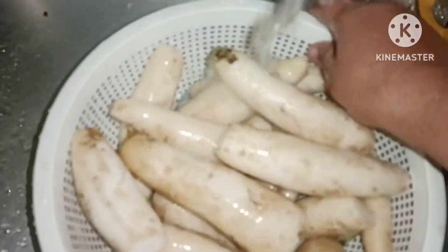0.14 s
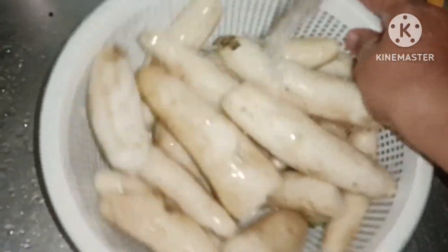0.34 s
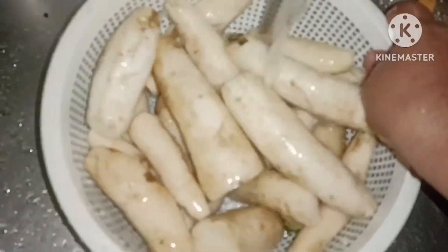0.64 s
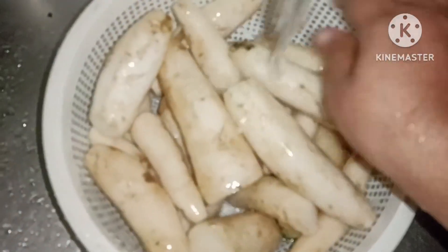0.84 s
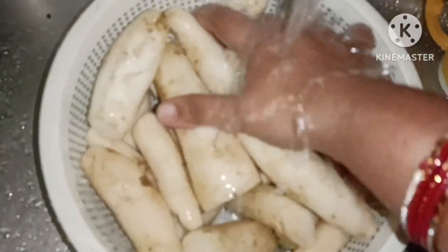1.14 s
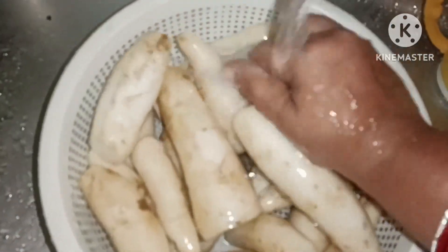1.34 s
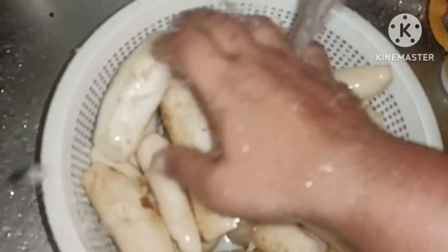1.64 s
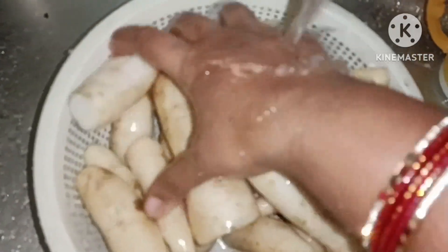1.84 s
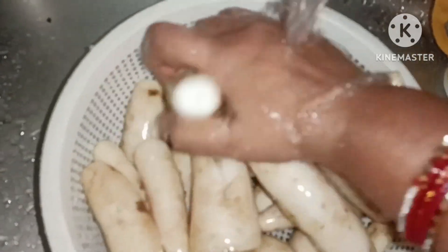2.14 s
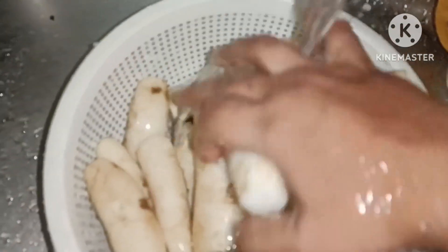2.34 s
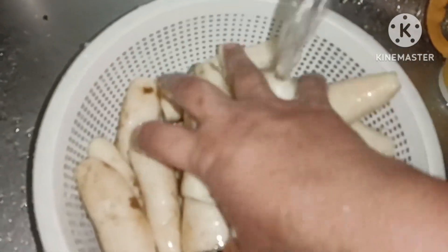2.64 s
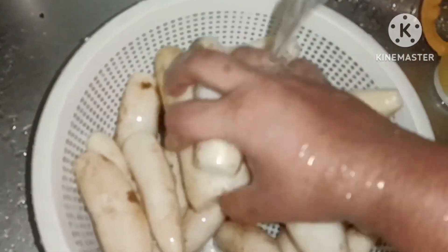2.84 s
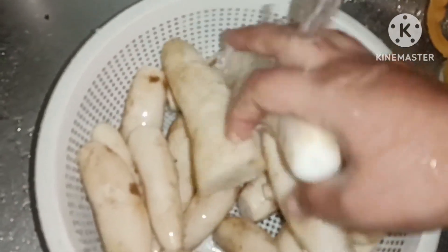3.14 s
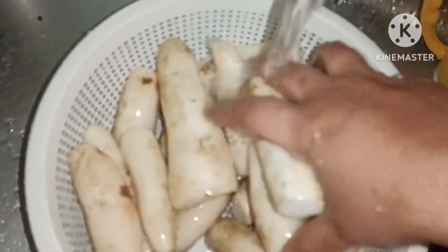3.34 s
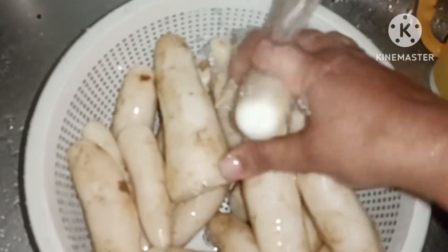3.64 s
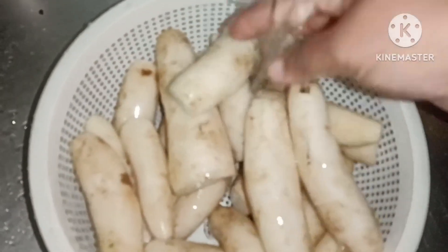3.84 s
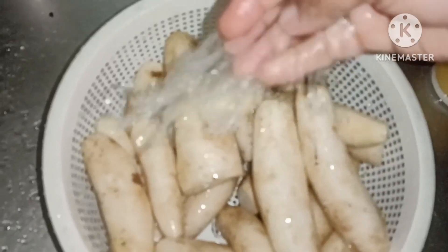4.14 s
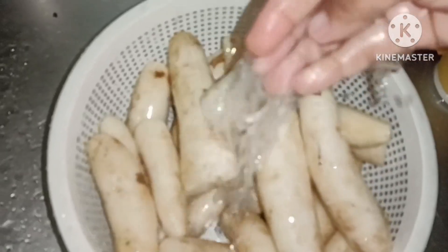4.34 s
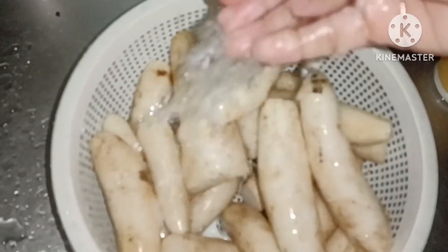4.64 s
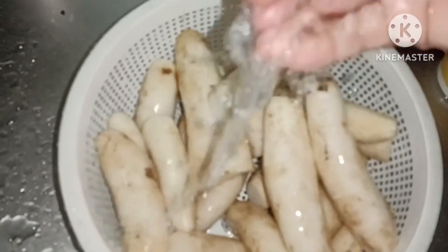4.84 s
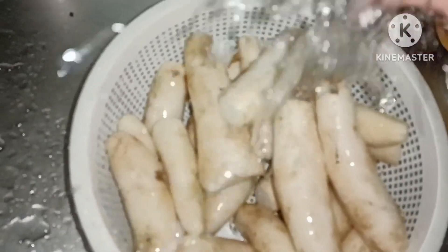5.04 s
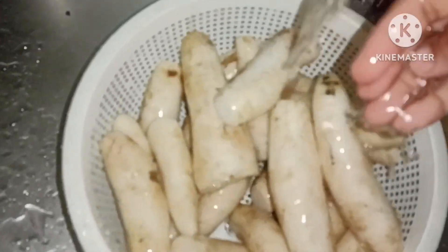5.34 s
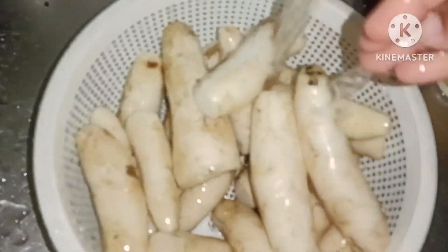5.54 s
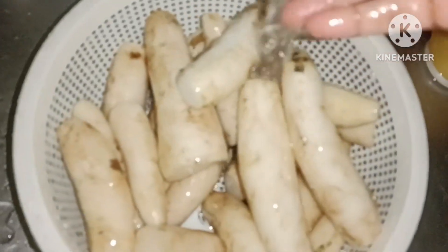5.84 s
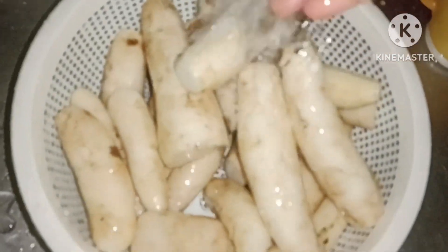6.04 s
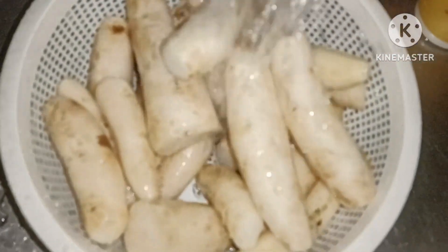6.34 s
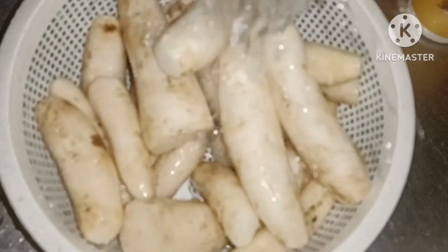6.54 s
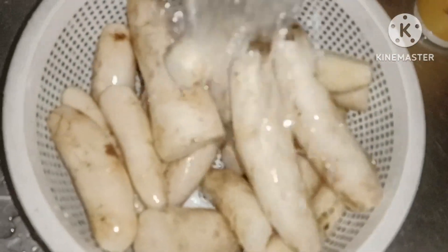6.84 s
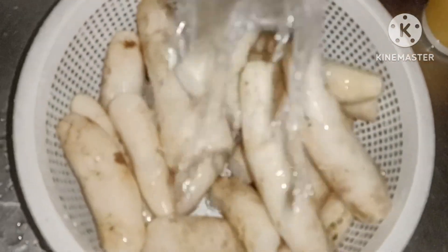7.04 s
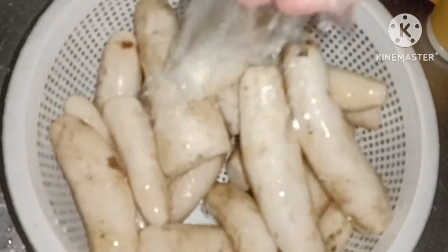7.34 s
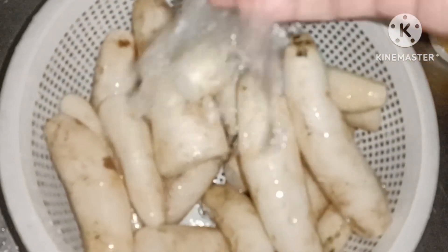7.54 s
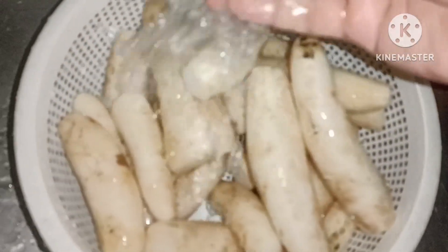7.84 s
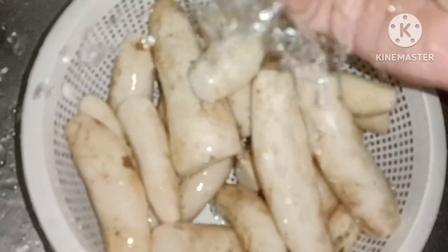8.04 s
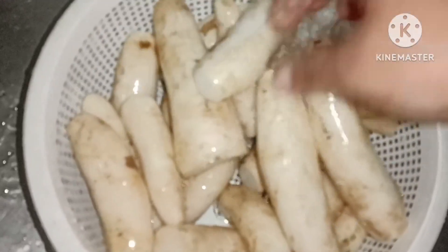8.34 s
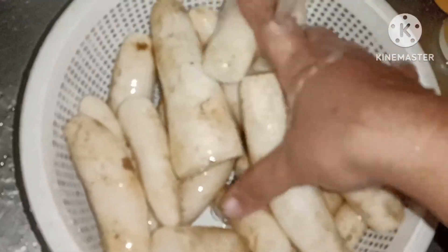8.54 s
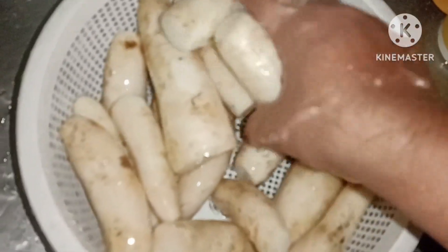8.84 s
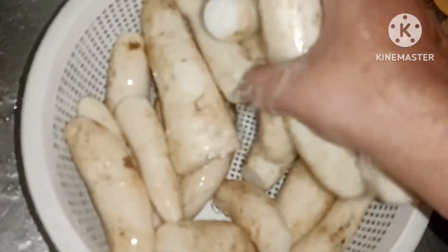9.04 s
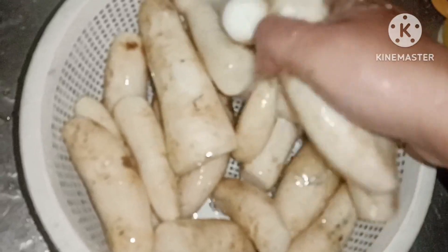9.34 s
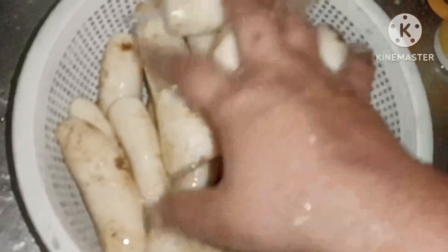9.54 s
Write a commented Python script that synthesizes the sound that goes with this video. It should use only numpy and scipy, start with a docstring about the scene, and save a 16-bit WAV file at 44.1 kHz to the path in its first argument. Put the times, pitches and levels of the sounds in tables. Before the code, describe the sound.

A tap runs and splashes over vegetables in a colander while a hand shuffles them, knocking and rumbling against a steel sink.

```python
"""Rinsing vegetables in a steel sink

A kitchen tap runs over vegetables in a plastic colander, close to a two-port microphone.
The water hisses, spits drops and slaps; trapped air pings, and trickles ring the sink.
Underneath, the stream drums and gurgles on the basin, which rumbles when a hand shoves
the vegetables and booms when it drops them."""
import sys
import numpy as np
from scipy import signal
from scipy.fft import rfft, irfft, next_fast_len
from scipy.io import wavfile
from scipy.ndimage import uniform_filter1d

SR = 44100
rng = np.random.default_rng(int(sys.argv[2]) if len(sys.argv) > 2 else 0)


def wav_out(sig):
    """Save sig, one row per channel (or a flat mono array), as 16-bit PCM at SR to the path in sys.argv[1]."""
    wavfile.write(sys.argv[1], SR, np.round(np.clip(np.atleast_2d(sig).T, -1, 1) * 32767).astype(np.int16))


N = 426888
T = np.arange(N) / SR
HZ = np.fft.rfftfreq(next_fast_len(N + SR // 2), 1 / SR)


# The stream's slow changes: time_s, level_db, brightness_db_per_octave
STREAM = [(0, -36, 1.5), (.3, -32.5, -1), (.75, -34.5, -2), (1.2, -35, -1), (1.6, -36, -0.5),
          (2.2, -36.5, 0.5), (2.6, -32, -2.5), (3.1, -33.5, -1.5), (3.7, -34, -1.5), (4.2, -37, -0.5),
          (4.5, -34, -1), (5.2, -34.5, 0), (5.7, -35.5, 0), (6.3, -33.5, -0.5), (6.6, -33, 2),
          (6.87, -37, -1), (7.6, -33.5, -1), (8.2, -35, -1), (8.7, -33, -0.5), (9.2, -35, -1.5),
          (9.68, -35, 0)]
def splash(drop_share=0.49, patch_db=1.5, flicker_db=0.7, correlation=0.063, tilt_per_db=-0.2737):
    """The stream breaks into hiss and drops, in drifting patches; more water sounds fuller."""
    a, b = rng.standard_normal((2, N))
    hiss = np.array([a, correlation * a + np.sqrt(1 - correlation ** 2) * b])
    hiss = hiss * lumps(0.01, flicker_db) * (1 + .6 * spits())
    water = np.sqrt(1 - drop_share) * unit_rms(hiss) + np.sqrt(drop_share) * drops()
    hz, t, spectrum = signal.stft(water, SR, nperseg=256, noverlap=192)
    patches = rng.standard_normal((len(t), len(hz)))
    patches = uniform_filter1d(uniform_filter1d(patches, 25, 0), 7, 1)
    patches = unit_rms(patches - uniform_filter1d(patches, 150, 0)).T
    times, level_db, brightness = np.transpose(STREAM)
    octaves = np.log2(np.maximum(hz, 600) / 3000)[:, None]
    octaves += 2.6 * np.minimum(octaves + 1.07, 0)  # a thin stream loses its low end first
    surge = surge_db(t)
    tilt = np.interp(t, times, brightness) + tilt_per_db * surge
    spectrum *= gain_of(np.interp(t, times, level_db) + surge + octaves * tilt + patch_db * patches)
    return signal.istft(spectrum, SR, nperseg=256, noverlap=192)[1][:, :N]


def spits(per_s=40, spread_db=3.5, t60_s=0.02):
    """The stream breaks up: an envelope of sudden, fast-dying bursts."""
    return signal.lfilter([1], [1, -gain_of(-60 / (t60_s * SR))], impulses(per_s, spread_db))


def drops(per_s=1500, spread_db=4.5):
    """Single drops make short rising pings, bunched in spurts; a few are large."""
    sizes = gain_of(spread_db * np.minimum(rng.exponential(1, N), 4))
    hits = sizes * (rng.random(N) < per_s * lumps(.015, 4) / SR)
    pitch_index, out = rng.integers(0, 30, N), np.zeros(N)
    for k, hz in enumerate(np.geomspace(1300, 15000, 30)):
        cycles = np.arange(int(20 * SR / hz)) * hz / SR
        ping = np.sin(2 * np.pi * cycles * (1 + 0.0085 * cycles)) * np.exp(-cycles / 2.5)
        ping *= hz ** 0.96  # small drops are short, so they are weighted up
        out += signal.oaconvolve(hits * (pitch_index == k), ping)[:N]
    return unit_rms(wall_reflections(out))


# Gathered water spills at once: start_s, hold_s, lift_db
GUSHES = [(0, .01, 6), (.12, 0.057, 3), (.46, 0.027, 6), (1.26, .02, 1), (1.37, 0.31, 5.5), (1.82, 0.13, 7),
          (1.99, 0.032, 3), (2.18, 0.0059, 0), (2.4, .02, -2.5), (2.51, 0.049, 3.5), (2.86, 0.068, 1),
          (3.12, 0.026, 2.5), (3.3, .11, 3.5), (3.53, 0.075, 2.5), (3.98, 0.15, 5.5), (4.93, 0.025, 4),
          (5.44, 0.085, 5), (5.59, 0.058, 5), (5.7, 0.019, 8), (5.78, 0.032, 7.5), (5.865, 0.05, 5),
          (6.52, 0.016, 2.5), (6.93, 0.086, 6), (7.24, 0.024, 1.5), (7.43, .02, 3), (7.79, .02, 1),
          (8.45, 0.072, 7), (8.98, 0.024, 3.5), (9.41, 0.047, 6), (9.59, .02, -1.5)]
# The splash thins for a moment, then snaps back: start_s, hold_s, dip_db
LULLS = [(1.07, 0.014, 3.5), (1.16, .08, 2.5), (1.67, 0.029, 9.5), (1.96, 0.0087, 7.5), (2.08, 0.064, 3),
         (2.33, 0.038, 5.5), (2.46, 0.023, 6.5), (3.47, 0.012, 4), (3.64, 0.036, 2), (3.79, 0.023, 2.5),
         (4.25, 0.1, 4.5), (5.33, .03, 4.5), (5.84, 0.012, 4.5), (7.52, 0.015, 4), (8.33, 0.094, 5),
         (9.09, 0.089, 2.5), (9.51, .02, 1)]
def surge_db(t):
    """How far gushes lift the stream and lulls lower it."""
    def ramps(table, attack_s, release_s):
        return sum(np.interp(t, [s - attack_s, s, s + hold, s + hold + release_s], [0, db, db, 0])
                   for s, hold, db in table)
    return ramps(GUSHES, attack_s=0.043, release_s=0.04) - ramps(LULLS, attack_s=0.047, release_s=0.028)


# Slaps of water: start_s, level_db, pitch_hz, relative_spray_db
SLAPS = [(0.1196, -11, 4080, -26), (0.1488, -15, 2580, -17), (0.368, -23.5, 2720, 8.5),
         (0.5816, -14, 2160, -5), (0.7364, -17, 2730, -5), (0.8797, -22.5, 3100, 3.5),
         (0.9954, -16.5, 3980, -18), (1.098, -10, 1740, -17), (1.2562, -10, 2460, -7),
         (1.3678, -11, 2200, -24), (1.8194, -13, 2100, -23), (1.8569, -10.5, 2500, -9),
         (1.9112, -20, 2550, 2.5), (1.979, -23, 2820, 4), (2.1307, -22, 3320, -9), (2.1549, -19, 3300, -21),
         (2.169, -17.5, 2980, -12), (2.252, -11.5, 2900, -5), (2.2976, -12.5, 2900, -30),
         (2.404, -16, 3230, -8), (2.497, -12, 2400, -4.5), (2.86, -13.5, 1780, -25),
         (3.137, -11.5, 3530, -8), (3.297, -18, 2840, -9), (3.3722, -15.5, 1750, -9),
         (3.579, -18.5, 2370, -16), (3.612, -13.5, 3980, -13), (3.8598, -16.5, 1680, -25),
         (3.912, -8.5, 3000, -22), (3.9764, -11, 2020, -12), (4.028, -24, 2240, 5.5),
         (4.0536, -19, 1500, -6), (4.086, -12.5, 3380, -22), (4.117, -20.5, 1680, 1),
         (4.1973, -21.5, 2420, -16), (4.308, -20, 4230, -6), (4.3938, -14.5, 3300, -18),
         (4.449, -16.5, 4400, -9), (4.489, -12, 4140, -11), (4.7405, -15.5, 3230, -14),
         (4.9282, -13, 1960, -14), (4.937, -16, 2600, -14), (4.952, -14, 2060, -16),
         (4.968, -10, 2110, -22), (5.104, -19.5, 2460, -4), (5.139, -17, 4250, -11),
         (5.5892, -16, 1790, -15), (5.619, -14.5, 3230, -11), (5.7062, -13, 2900, -15),
         (6.065, -25, 5060, -2), (6.0998, -10.5, 1900, -28), (6.999, -15, 2420, -14),
         (7.211, -19.5, 2570, 1), (7.343, -13, 3600, -14), (7.4393, -12.5, 2620, -17),
         (7.608, -17.5, 3950, -19), (7.785, -14.5, 3770, -12), (7.9017, -19, 2180, -20),
         (7.927, -20, 2940, -18), (8.031, -18, 2070, -10), (8.083, -18, 2310, -4), (8.2254, -19, 2210, -19),
         (8.2565, -11.5, 2350, -27), (8.323, -17, 4660, -15), (8.3794, -19.5, 2080, -7),
         (8.428, -17.5, 2280, -15), (8.98, -16, 3670, -11), (9.107, -10.5, 2410, -27),
         (9.196, -22, 2900, -11), (9.234, -19, 3100, -4.5), (9.3867, -13.5, 1800, 0),
         (9.416, -16, 5430, -5), (9.5617, -18, 5130, -3), (9.5806, -10, 2560, -10), (9.603, -14, 3300, -15)]
def slaps(correlation=0.22, t60_s=0.036, crack_s=0.00091, attack_s=0.00029):
    """Each slap throws a broad crack of spray and traps a pocket of air that rings briefly."""
    out, t = np.zeros((2, N)), np.arange(SR // 8) / SR
    envelope = gain_of(-60 * t / t60_s) * (1 - np.exp(-t / attack_s))
    noises = rng.standard_normal((len(SLAPS), 2, len(t)))
    for (start, db, hz, spray_db), (a, b) in zip(SLAPS, noises):
        burst = np.array([correlation * a + np.sqrt(1 - correlation ** 2) * b, a])
        chirp = np.sin(2 * np.pi * hz * t * (1 + 2.6 * t))  # rises as the pocket nears the surface
        pocket = 0.28 * chirp + 0.41 * resonate(burst, hz, 0.17 * hz)
        spray = gain_of(spray_db) * burst * (1 + 0.49 * np.exp(-t / crack_s))
        add(out.T, start, (gain_of(db) * envelope * (pocket + spray)).T)
    return out


def bubbles(per_s=110, spread_db=3.5, decay_cycles=3.4, relative_db=-12):
    """Sparse pockets of air ring a few cycles, rising a little; their level follows the stream."""
    hits = impulses(per_s, spread_db)
    pitch_index, out = rng.integers(0, 16, N), np.zeros(N)
    for k, hz in enumerate(np.geomspace(1600, 5500, 16)):
        cycles = np.arange(int(40 * SR / hz)) * hz / SR
        envelope = np.exp(-cycles / decay_cycles) * np.minimum(cycles, 1)
        ping = np.sin(2 * np.pi * cycles * (1 + 0.0018 * cycles)) * envelope
        out += signal.oaconvolve(hits * (pitch_index == k), ping)[:N]
    times, stream_db, _ = np.transpose(STREAM)
    level = gain_of(relative_db + np.interp(T, times, stream_db) + surge_db(T))
    return level * unit_rms(wall_reflections(out, t60_s=0.031, direct=.8))


# The hand pushes the pile against the basin: start_s, hold_s, level_db
SHOVES = [(0, 0.055, -36.5), (0.292, 0.02, -42), (0.465, 0.071, -32), (0.597, 0.16, -45.5),
          (.91, 0.06, -44.5), (1.133, 0.036, -33.5), (1.274, 0.06, -39), (1.333, .04, -36),
          (1.582, 0.045, -37.5), (1.692, 0.044, -52), (1.772, 0.071, -40), (1.87, 0.064, -36),
          (1.992, 0.18, -38), (2.2, 0.099, -47), (2.308, 0.16, -39), (2.524, .01, -34), (2.625, 0.036, -46),
          (2.705, 0.074, -42.5), (2.83, 0.013, -30), (2.878, 0.022, -26), (3.013, 0.075, -39),
          (3.179, 0.036, -35), (3.243, 0.022, -31.5), (3.327, 0.013, -25), (3.465, 0.071, -32.5),
          (3.568, 0.039, -30), (3.706, 0.049, -50), (3.812, 0.0087, -37), (3.882, 0.021, -25),
          (4.253, 0.017, -54), (4.446, 0.033, -55), (4.774, .025, -52), (5.378, 0.027, -56),
          (5.617, 0.042, -56), (5.94, 0.087, -46), (6.06, .04, -55), (6.45, .03, -55), (6.907, 0.21, -46),
          (7.265, 0.069, -47), (7.37, 0.044, -46.5), (8.55, .12, -32), (8.74, 0.046, -39),
          (8.82, 0.027, -30.5), (8.877, 0.11, -37.5), (9.127, 0.06, -41), (9.241, 0.1, -40.5),
          (9.398, 0.13, -33.5), (9.584, .02, -35.5)]
def shoves(resting_db=-63):
    """Shoved vegetables make the basin rumble; a faint rumble stays between pushes."""
    rubbing = rng.standard_normal((3, N))  # one shared noise, then one for each side
    pushes = swells(*np.transpose(SHOVES), rise_db_per_s=796, fall_db_per_s=270)
    effort = np.hypot(pushes, gain_of(resting_db) * lumps(0.067, 3.8, slow_s=0.68))
    return steadied(basin(rubbing[0] + 0.14 * rubbing[1:], "shoved")) * effort


# Vegetables knock the colander into the basin: start_s, strength_db, contact_ms
KNOCKS = [(0.467, -13.5, 1.1), (0.506, -16, 1.8), (0.529, -19, 1.7), (1.33, -25, 0.79), (1.869, -46, 2.8),
          (2.517, -33, 2.2), (2.892, -12, 2.2), (3.319, -13, 2), (3.426, -13.5, 4.4), (3.874, 7, 7.6),
          (8.606, -16.5, 2.2), (9.132, -58, 1.4), (9.438, -14, 3)]
def knocks():
    """Each knock booms the basin; a longer contact reaches fewer high modes."""
    force = np.zeros(N)
    for start, db, contact_ms in KNOCKS:
        push = np.hanning(round(contact_ms * SR / 1000) + 2)
        add(force, start, gain_of(db) * push / push.sum())
    return gain_of(38) * basin(force, "knocked")


# The stream landing on steel: time_s, hollow_db, gurgle_db, gurgle_hz
DRUMMING = [(0, -46, -60, 970), (.35, -70, -48, 1100), (.6, -49, -45.5, 755), (1.0, -56, -49.5, 695),
            (1.24, -57, -61, 860), (1.55, -56, -58, 720), (1.75, -63, -68, 855), (2.3, -55, -61.5, 685),
            (2.7, -51.5, -53, 780), (3.2, -50.5, -55, 800), (3.8, -53, -70, 720), (4.3, -56.5, -75, 1000),
            (4.9, -64, -77, 1050), (5.3, -55, -61.5, 800), (5.6, -58, -48.5, 660), (5.92, -47, -45, 670),
            (6.03, -73, -61, 650), (6.3, -73, -70, 900), (6.58, -57, -56.5, 800), (6.85, -69, -70, 910),
            (7.08, -52, -51.5, 710), (7.28, -72, -74, 880), (7.5, -64.5, -52, 1070), (7.9, -70, -62.5, 930),
            (8.25, -53, -69, 635), (8.5, -52.5, -58, 915), (9.0, -48.5, -54, 680), (9.25, -50.5, -85, 750),
            (9.68, -50.5, -76, 705)]
# Water sloshes, mostly when the basin is jolted: start_s, hold_s, hollow_db, gurgle_db
SLOSHES = [(0, 0.014, -45, -57), (.47, 0.041, -35.5, -40), (1.341, 0.057, -41.5, -47.5),
           (1.86, 0.05, -40.5, -48), (2.014, .03, -48, -59), (2.1, 0.026, -50, -68),
           (2.53, 0.09, -48.5, -46), (2.882, 0.074, -48, -51), (2.98, 0.025, -46, -44),
           (3.332, 0.028, -35, -46), (3.71, 0.022, -46, -76), (3.905, 0.14, -47, -44.5),
           (4.48, 0.027, -51, -74), (5.362, .04, -44.5, -61), (6.062, .015, -68, -47),
           (6.1, 0.0089, -53, -47), (6.92, 0.07, -73, -57), (8.358, 0.038, -47, -79),
           (8.61, 0.057, -44, -50), (8.752, 0.084, -45.5, -48), (9.135, 0.022, -45.5, -70),
           (9.376, 0.033, -45.5, -47)]
def drumming(surge_share=0.45, slosh_hz=660):
    """Water drums a hollow ring from the basin and gurgles, swelling with gushes and sloshes."""
    times, *curves = np.transpose(DRUMMING)
    hollow_db, gurgle_db, gurgle_hz = (np.interp(T, times, curve) for curve in curves)
    starts, holds, *levels = np.transpose(SLOSHES)
    slosh_hollow, slosh_gurgle = (swells(starts, holds, db, rise_db_per_s=504, fall_db_per_s=175)
                                  for db in levels)
    surge = gain_of(surge_share * surge_db(T))
    hollow_gain = np.hypot(surge * gain_of(hollow_db), slosh_hollow)
    gurgle_gain = np.hypot(surge * gain_of(gurgle_db), slosh_gurgle)
    gurgle_hz += (slosh_hz - gurgle_hz) * (slosh_gurgle / gurgle_gain) ** 2  # a slosh gurgles low
    patter = rng.standard_normal((3, N)) * lumps(.02, 3.0)
    hollow = unit_rms(basin(patter[0] + 1.12 * patter[1:], "drummed"))
    return hollow * hollow_gain + gurgle(gurgle_hz) * gurgle_gain


def gurgle(centre_hz, width_hz=260):
    """Lumpy noise rings a broad hollow between water and steel, whose pitch moves."""
    churn = (rng.standard_normal(N) + rng.standard_normal((2, N))) * lumps(0.037, 3.34)
    carrier = np.exp(2j * np.pi * np.cumsum(centre_hz) / SR)
    pole = np.exp(-np.pi * width_hz / SR)
    baseband = signal.lfilter([1], np.convolve([1, -pole], [1, -pole]), churn / carrier)
    return unit_rms((carrier * baseband).real)


# Trickles that keep the sink ringing: start_s, length_s, pitch_hz, level_db
TRICKLES = [(1.354, 0.051, 1760, -35), (1.47, 0.29, 2940, -42), (1.494, .09, 2100, -30.5),
            (1.836, 0.11, 3300, -42), (2.123, 0.07, 3430, -41), (2.23, .1, 2880, -31.5),
            (3.28, 0.038, 2900, -46), (3.281, 0.2, 1530, -39.5), (4.025, 0.055, 1440, -34.5),
            (4.296, 0.058, 2260, -38.5), (4.935, 0.078, 2240, -33), (5.433, 0.12, 3000, -33.5),
            (5.581, 0.063, 1830, -31), (6.558, 0.14, 1850, -40), (6.901, 0.084, 3450, -31),
            (7.625, 0.07, 2240, -51), (8.85, 0.082, 1850, -37.5)]
def trickles(width_hz=55, per_s=90):
    """Drops in quick uneven succession strike one narrow ring of the sink, off to the right."""
    out, draws = np.zeros((2, N)), rng.random((len(TRICKLES), 2, SR // 4))
    for (start, length, hz, db), (chance, size) in zip(TRICKLES, draws):
        count = min(round(length * SR), len(chance))
        hits = (chance < per_s / SR) * (0.37 + size)
        wash = 0.032 * (size - .5)
        ring = resonate((hits + wash)[:count], hz, width_hz) * signal.windows.tukey(count, .4)
        add(out.T, start, gain_of(db) * np.outer(ring, gain_of([-7, 0])))
    return out


# The basin's low modes: pitch_hz, width_hz, shoved_db, drummed_db, knocked_db
BASIN_MODES = [(65.6, 61, -9, -45, -33), (121.6, 24.3, 9.5, -9, -3), (183.5, 50.6, -5, -39, -12),
               (249.7, 9.5, -61, -21, 2), (271, 35, -49, 0.5, -8.5), (369, 75, -22.5, 4.5, -5),
               (471, 38, -26, 19, -5), (524, 110, -44, -8, -13), (654, 28, -43, -36, -10),
               (930, 88, -21, -4, -12)]
def basin(x, drive):
    """The steel rings in modes of alternating polarity, weighted by how it is driven."""
    column = 2 + ["shoved", "drummed", "knocked"].index(drive)
    modes = ((-1) ** k * gain_of(row[column]) * mode(*row[:2]) for k, row in enumerate(BASIN_MODES))
    return filtered(x, sum(modes))


# The sink's higher rings: pitch_hz, width_hz, strength
SINK_RINGS = [(1383, 130, 1), (1790, 37, 0.89), (2160, 13, 1), (2447, 46, 0.74), (2900, 47, 0.64),
              (3450, 53, 0.22), (3980, 62, 0.065)]
# The tone of the splash at each microphone port: frequency_hz, left_db, right_db
PORT_TONE = [(483, -33.5, -11), (740, -64, -48), (1055, -19, -15.5), (1200, -25.5, -19.5),
             (2060, -19.5, -10.5), (2900, -20, -13), (4400, -23.5, -15), (5490, -18, -16),
             (6850, -19, -27.5), (7590, -22, -27), (9470, -36.5, -34.5), (9550, -31.5, -28),
             (12200, -24.5, -26.5), (14900, -19, -32.5), (16500, -15, -53)]
def splash_colour(x, low_cut_hz=1050):
    """The sink's rings and each port's tone colour the spray, which has no bass."""
    hz, *sides = np.transpose(PORT_TONE)
    tone = gain_of([np.interp(np.log(HZ + 1), np.log(hz), db) for db in sides])
    low_cut = (HZ ** 2 / (HZ ** 2 + low_cut_hz ** 2)) ** 2
    rings = 1 + sum(strength * mode(pitch, width) for pitch, width, strength in SINK_RINGS)
    colour = tone * low_cut * rings
    return filtered(x, colour / np.sqrt(np.mean(abs(colour) ** 2) / 2))


def wall_reflections(x, t60_s=0.053, direct=.55, wander_hz=3.1):
    """Close stereo echoes inside the sink; three sets take turns as the water lands elsewhere."""
    t = np.arange(SR // 16) / SR
    tails = rng.standard_normal((3, 2, len(t))) * gain_of(-60 * t / t60_s)
    tails *= np.sqrt(1 - direct ** 2) / np.linalg.norm(tails, axis=2, keepdims=True)
    tails[..., 0] = direct
    fades = [np.cos(2 * np.pi * (wander_hz * T + k / 3)) for k in range(3)]
    return sum(signal.oaconvolve((x * fade)[None], tail, axes=1)[:, :N]
               for fade, tail in zip(fades, tails))


def impulses(per_s, spread_db):
    """Randomly timed hits, mostly small, a few large."""
    sizes = gain_of(spread_db * np.minimum(rng.exponential(1, N), 3))
    return sizes * (rng.random(N) < per_s / SR)


def lumps(smooth_s, spread_db, slow_s=.12):
    """A random gain that wanders over smooth_s and evens out over slow_s."""
    size = round(smooth_s * SR)
    wander = uniform_filter1d(uniform_filter1d(rng.standard_normal(N), size), size)
    return gain_of(spread_db * unit_rms(wander - uniform_filter1d(wander, round(slow_s * SR))))


def swells(starts, holds, levels_db, rise_db_per_s, fall_db_per_s):
    """Combined gain of events that climb to their level, hold it and die away."""
    power = np.zeros(N)
    for start, hold, db in zip(starts, holds, levels_db):
        before_s, after_s = np.maximum(start - T, 0), np.maximum(T - start - hold, 0)
        power += gain_of(db - rise_db_per_s * before_s - fall_db_per_s * after_s) ** 2
    return np.sqrt(power)


def steadied(x, window_s=0.03, depth=0.47):
    """Tames the chance swells of narrow noise."""
    power = uniform_filter1d((x ** 2).mean(0), round(window_s * SR))
    return unit_rms(x / (abs(power) + 0.015 * power.mean()) ** (depth / 2))


def resonate(x, hz, width_hz):
    """Rings a two-pole resonance, at unit level."""
    pole = np.exp(-np.pi * width_hz / SR)
    feedback = [1, -2 * pole * np.cos(2 * np.pi * hz / SR), pole * pole]
    return unit_rms(signal.lfilter([1, 0, -1], feedback, x))


def mode(hz, width_hz):
    """The response of one damped resonance, with gain 1 at its centre."""
    return 1j * HZ * width_hz / (hz ** 2 - HZ ** 2 + 1j * HZ * width_hz)


def filtered(x, response):
    """Applies a frequency response given on HZ."""
    size = 2 * (len(HZ) - 1)
    return irfft(rfft(x, size) * response, size)[..., :N]


def gain_of(db):
    return 10 ** (np.asarray(db) / 20)


def unit_rms(x):
    return x / np.sqrt(np.mean(x ** 2) + 1e-20)


def add(mix, start_s, sound):
    part = mix[round(start_s * SR):][:len(sound)]
    part += sound[:len(part)]


def scene():
    """Bright water on top, the low steel of the basin beneath."""
    water = splash_colour(splash() + gain_of(-6.5) * slaps() + bubbles()) + trickles()
    handling = (shoves() + knocks()) * gain_of([[-.7], [.7]])  # just right of centre
    return water + handling + drumming()


def record(dry, cutoff_hz=15495):
    """A steep low-pass takes off the very top of the hiss."""
    low_pass = signal.firwin(1501, cutoff_hz, window=("kaiser", 7), fs=SR)
    return signal.oaconvolve(dry, low_pass[None], "same")


dry = scene()
out = record(dry)
wav_out(out)
```